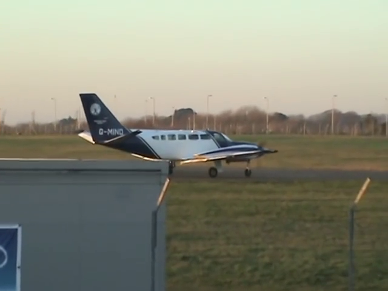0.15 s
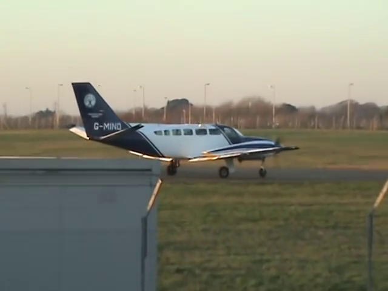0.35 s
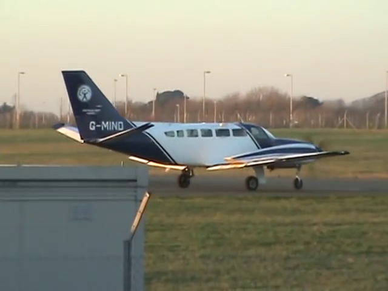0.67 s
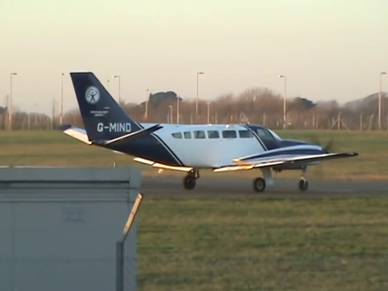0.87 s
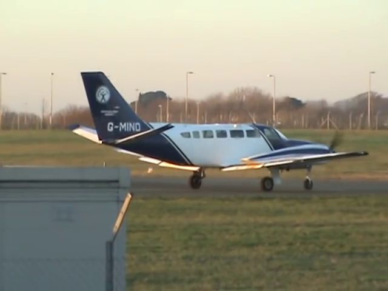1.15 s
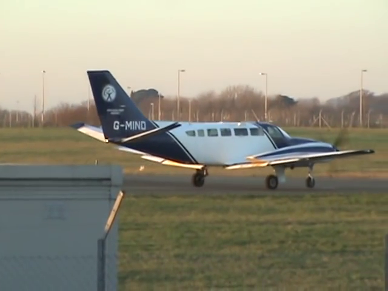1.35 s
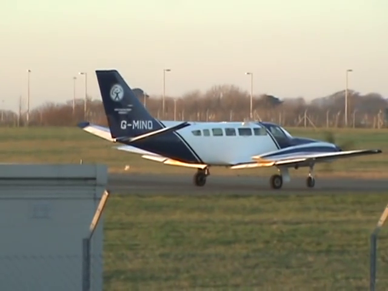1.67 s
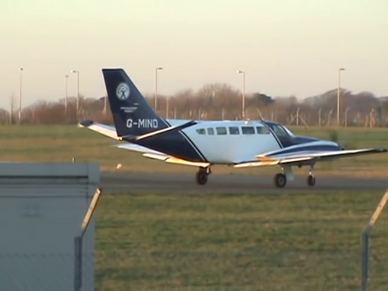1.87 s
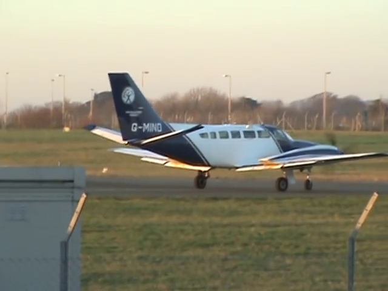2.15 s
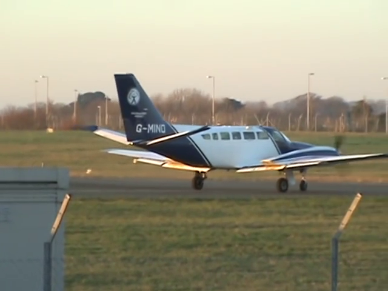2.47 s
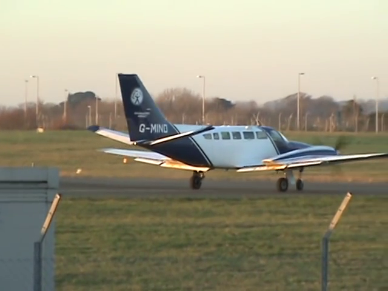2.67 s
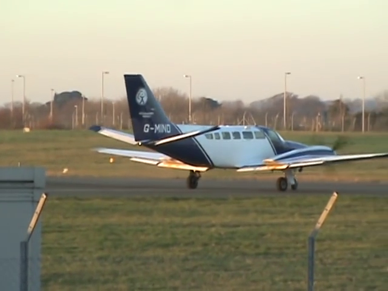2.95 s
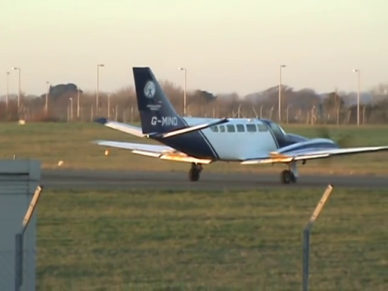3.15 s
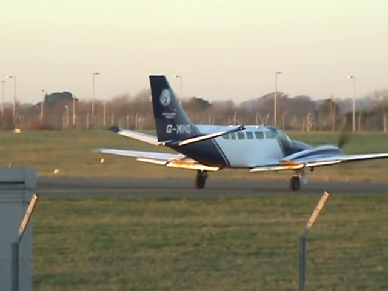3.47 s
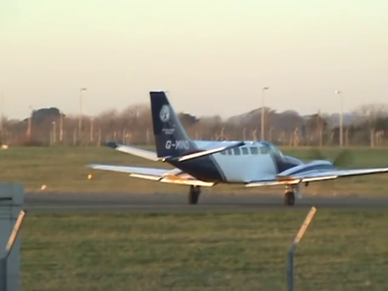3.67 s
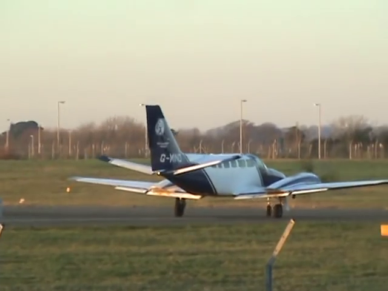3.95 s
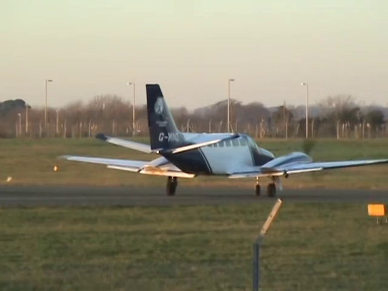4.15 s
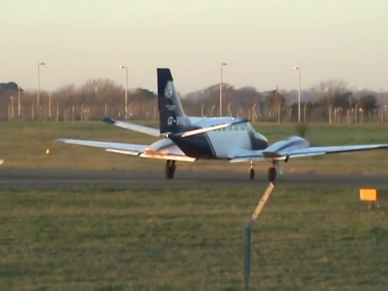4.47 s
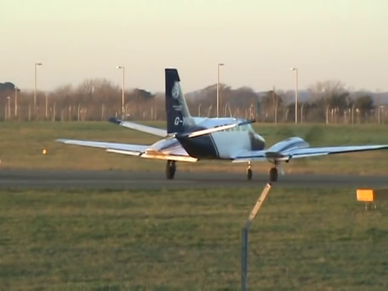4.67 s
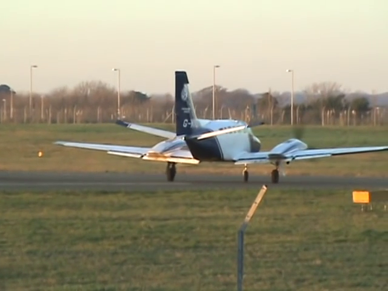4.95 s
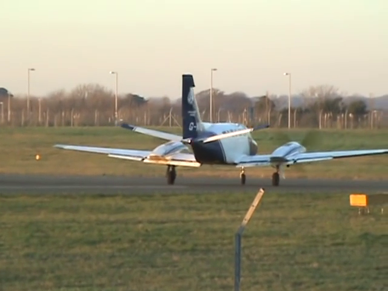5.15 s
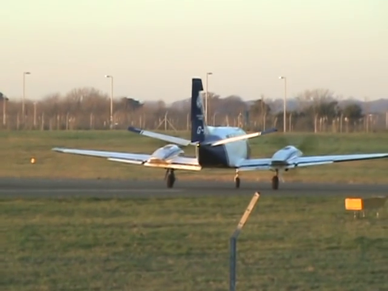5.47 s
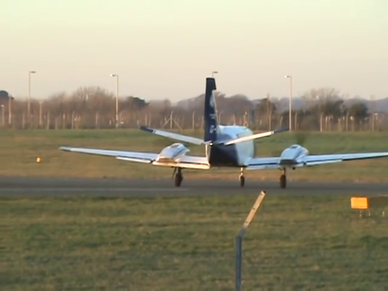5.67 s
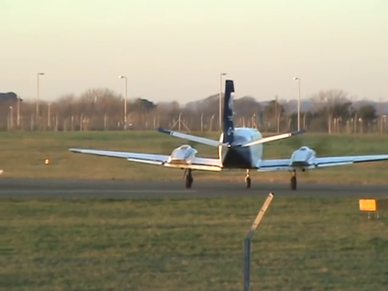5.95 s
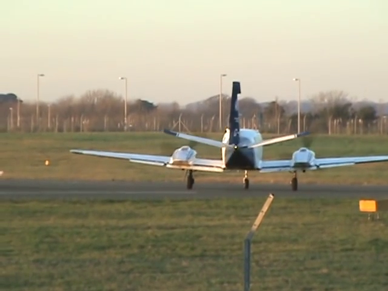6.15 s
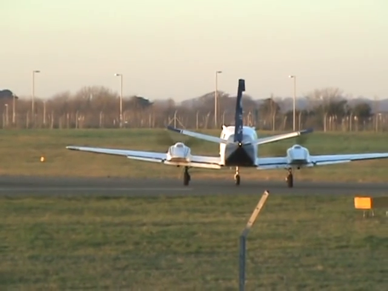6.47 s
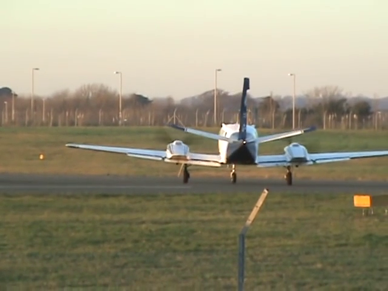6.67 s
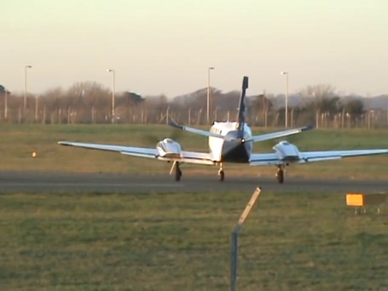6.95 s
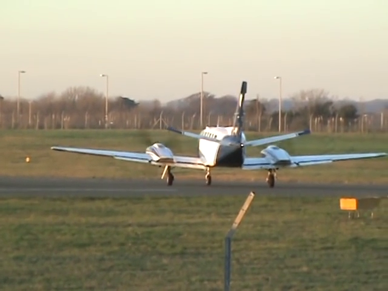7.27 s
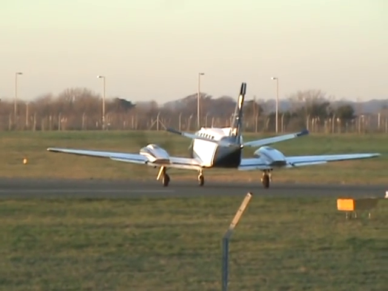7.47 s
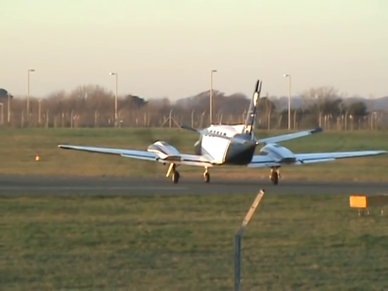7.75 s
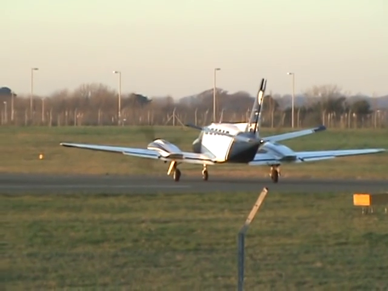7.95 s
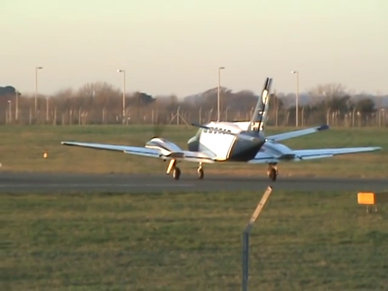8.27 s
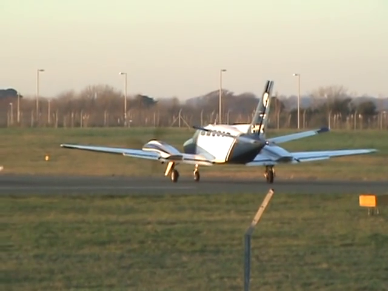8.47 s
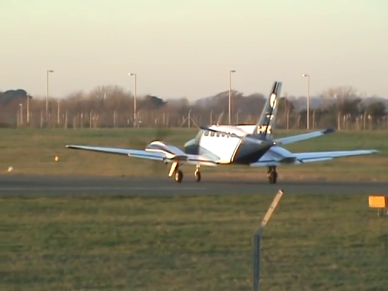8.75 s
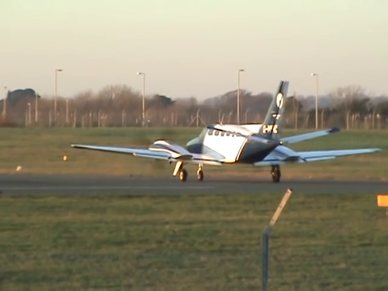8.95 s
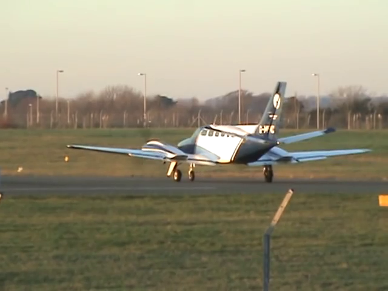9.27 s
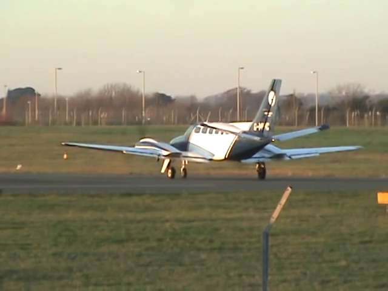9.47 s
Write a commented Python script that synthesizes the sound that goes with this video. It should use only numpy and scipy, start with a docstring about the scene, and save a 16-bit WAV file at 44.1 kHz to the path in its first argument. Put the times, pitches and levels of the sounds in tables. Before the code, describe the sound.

Two piston aircraft engines run at taxi power in the middle distance, a steady, throbbing low drone with propeller rasp and hiss. The nearer engine ticks quickly and crackles once early on. Around halfway the ticking drops out and the propellers swell with a few dry cracks, then soften as the plane swings away. Brief low wind buffets reach the microphone, over a dull outdoor airfield roar.

```python
"""A twin piston aircraft taxis past some way off and turns its tail to the listener.
Its two six-cylinder engines drift apart in speed, so their exhaust drones beat over a low rumble.
Geared three-blade propellers chop the air into wash, rasp and hiss; the near engine ticks while it is
side-on. Thumps, slaps, a crackle and faint whistles dot the pass. Sheds and fences add a short tail,
a little wind touches the microphone, and the airfield roars dully behind it all."""
import sys
import numpy as np
from scipy import signal
from scipy.fft import rfft, irfft, next_fast_len
from scipy.io import wavfile
from scipy.ndimage import uniform_filter1d, map_coordinates

SR = 44100
rng = np.random.default_rng(int(sys.argv[2]) if len(sys.argv) > 2 else 0)


def dump_mix(stems):
    """Bounce the given channels to the path in sys.argv[1] as a 16-bit WAV at rate SR."""
    frames = np.atleast_2d(stems).T  # one column per channel
    limited = np.clip(frames, -1, 1)  # hard clip at full scale
    pcm = np.round(limited * 32767).astype(np.int16)
    wavfile.write(sys.argv[1], SR, pcm)


N = 423801

# share of the noise that comes from the near engine's open flank: t/s, share/0-1
FLANK_SHARE = [(0, 0.9), (.8, 0.86), (1.4, 0.96), (2.2, 0.24), (3.6, 0.21), (4.6, 0), (9.6, 0)]
# spectrum of the tip hiss and the hiss under the ticks: f/Hz, relative level/dB
HISS_COLOUR = [(2500, -25), (3600, -2.5), (4100, 1.5), (4550, -5), (5100, 1), (5450, -7.5), (5800, -2),
               (6250, -6.5), (6800, -2.5), (8400, -10.5), (9500, -15.5), (11000, -29), (15000, -51)]


def exhaust(turns, firing, uneven, firing_db, uneven_db, hard_turn, spread, shake, waver_db):
    """Three firings a turn make the drone; one harder cylinder adds a chug every second turn."""
    angle = 2 * np.pi * turns + shake * wobble(22)
    drone = np.zeros(N)
    for k, level in enumerate(curves(firing), 1):
        stretch = -1.7 * (k - 1) * (k - 2.8)  # the pipe spreads each pulse into a short ring
        drone += amp(level + firing_db + waver_db * wobble(14)) * np.cos(3 * k * angle + stretch)
    behind = np.clip((clock() - 4.2) / 1.25, 0, 1)  # the tail swings round
    receding_db = -4.5 * np.clip((clock() - 6.6) / 0.9, 0, 1)
    for order, side_db, rear_db in uneven:
        level = side_db + behind * (rear_db - side_db) + uneven_db + receding_db + 2.25 * wobble(6)
        smear = 0.352 * (order - 8.5) ** 2 + spread * rng.standard_normal()  # the pipe smears the chug
        drone += amp(level) * np.cos(order * (angle - 2 * np.pi * hard_turn) + smear)
    return np.sqrt(2) * drone


def engines(right_turns, left_turns):
    """Two exhausts at slightly different speeds beat against each other."""
    # exhaust tones as the pipes turn: t/s, relative level/dB at 1, 2 and 3 times the firing rate
    right_firing = [(0.0, -41, -31.5, -30.5), (1.2, -38.5, -28, -23), (2.4, -33, -27, -28.5),
                    (3.6, -30, -31, -25.5), (4.8, -29.5, -26, -30.5), (6.0, -31, -26, -41),
                    (7.2, -32.5, -27, -44.5), (8.4, -33.5, -28.5, -48), (9.6, -35.5, -32, -34.5)]
    left_firing = [(0.0, -37, -35.5, -20), (1.2, -40.5, -44, -30.5), (2.4, -39, -34.5, -26),
                   (3.6, -39.7, -43, -26.5), (4.8, -38, -30, -28), (6.0, -39, -38, -29),
                   (7.2, -36.5, -32, -36), (8.4, -37, -40.5, -40), (9.6, -35, -38.8, -35.5)]
    # tones of unequal cylinders: multiple of crank speed, relative level/dB side-on and from behind
    right_uneven = [(4, -49, -43.5), (4.5, -51, -39.5), (6.5, -69, -41), (7, -37.5, -42.5),
                    (7.5, -33.5, -33.5), (8, -45, -47.5), (8.5, -53, -46.5), (10, -40, -46),
                    (10.5, -40, -48.5), (11, -39.5, -54.5), (11.5, -49, -53.5), (12, -41, -52),
                    (12.5, -42, -50), (14, -47.5, -64.5)]
    left_uneven = [(4, -42, -40), (4.5, -42.5, -55), (6.5, -67, -49), (8, -42, -42), (8.5, -42.5, -50),
                   (9.5, -45, -31.5), (10.5, -38, -44.5), (11, -42, -49.5), (12, -46, -44),
                   (12.5, -45.5, -45.5)]
    right = exhaust(right_turns, right_firing, right_uneven, firing_db=0.2, uneven_db=-1.54,
                    hard_turn=0.96, spread=0.79, shake=0.01, waver_db=1.08)
    left = exhaust(left_turns, left_firing, left_uneven, firing_db=0.44, uneven_db=-1.0,
                   hard_turn=0.6, spread=1.64, shake=0.015, waver_db=1.24)
    return right + left


def rumble():
    """No two firings are alike: a low flutter fills the gaps between the tones."""
    # irregular part of the combustion: t/s, level/dB
    loudness = [(0, -36.3), (3, -33.5), (6.2, -32.5), (8.3, -36.5), (9.6, -36)]
    # its spectrum: f/Hz, relative level/dB
    colour = [(12, -24), (30, -11), (48, -7), (72, -4), (90, -5), (105, -9.5), (150, 2.5), (170, -6.5),
              (190, -15), (210, -11.5), (250, -17), (300, -25), (400, -30.5), (700, -59.5)]
    return amp(curves(loudness)[0]) * noise(colour)


def propellers(right_turns, left_turns):
    """Slipstream, blade rasp and tip hiss follow one loudness and are chopped by the passing blades."""
    # propeller loudness as the aircraft turns: t/s, relative level/dB
    loudness = [(0.05, -38), (0.87, -36), (1.16, -35), (1.95, -39), (4.15, -40), (5.26, -35), (6.0, -36.5),
                (7.01, -44.5), (7.96, -44), (8.14, -42.5), (9.55, -42)]
    level_db, = curves(loudness)
    lift_db = level_db - level_db.mean()
    # each chops hardest as its disc swings past; the right one then slips behind the fuselage
    right_depth = 0.29 * np.minimum(until(7.9), 1) + swell(5.32, 0.6, 0.51)
    left_depth = 0.089 + swell(8.38, 0.36, 0.63)
    chop = right_depth * blade_beat(right_turns) + left_depth * blade_beat(left_turns)
    flutter = wobble(30)
    wash = slipstream(lift_db) * amp(0.8 * flutter) * (1 + 0.27 * chop)
    rasp = blade_rasp(level_db) * amp(0.64 * flutter) * (1 + 0.38 * chop)
    hiss = tip_hiss(lift_db) * amp(0.6 * flutter) * (1 + 0.32 * chop)
    return wash + rasp + hiss


def blade_beat(turns, scatter_db=1.5):
    """Three blades geared two to three pass twice a crank turn; the pulsing has mean 0."""
    times = passes(2 * turns - 0.27)
    pulses = bursts(times, amp(scatter_db * rng.standard_normal(len(times))), rise=0.003, decay=0.004)
    return pulses / pulses.mean() - 1


def slipstream(lift_db, lag_s=0.2):
    """A midrange wash of air sweeps past a little after the blade rasp."""
    # wash side-on and from behind: f/Hz, relative level/dB
    side_colour = [(200, -20), (300, -1.5), (400, -8), (500, -1.5), (640, -5), (760, -1.5), (835, 3.5),
                   (900, -4.5), (1020, -3.5), (1200, -7), (1800, -36)]
    rear_colour = [(200, -27), (300, -14), (380, -10.5), (480, -1.5), (600, -3), (710, 1.5), (830, -2.5),
                   (950, -4.5), (1150, -9.5), (1800, -39)]
    late_lift_db = np.interp(clock() - lag_s, clock(), lift_db)
    level_db = -42.5 + 0.5 * late_lift_db - 1.5 * curves(FLANK_SHARE)[0]
    return amp(level_db) * turning(noise(side_colour), noise(rear_colour))


def blade_rasp(level_db):
    """The blades tear the air into a rasp, grainier from the side."""
    # rasp side-on and from behind: f/Hz, relative level/dB
    side_colour = [(600, -35), (1050, -11), (1200, 1.5), (1400, -2), (1620, -3), (1820, 0.5), (1980, -5),
                   (2140, 1), (2420, -8.5), (2850, -2.5), (3300, -7.5), (4200, -23), (7000, -45.5)]
    rear_colour = [(600, -28), (1000, -2), (1220, 3.5), (1380, 2.5), (1480, -5), (1620, 2), (2100, -1.5),
                   (2380, -5), (2650, -4), (3400, -8), (4200, -17), (7000, -51)]
    rasp = turning(eddies(side_colour, patchy_db=3.0), eddies(rear_colour, patchy_db=1.02))
    return amp(level_db - 0.9) * rasp


def tip_hiss(lift_db, astern_s=5.43, turn_s=0.97):
    """The blade tips hiss most when they face the listener and dull as the far side comes round."""
    # flares of hiss: t/s, half length/s, boost/dB
    flares = [(4.7, .1, 4), (8.432, 0.15, 3), (9.352, 0.28, 5)]
    level_db = -51 + 0.88 * lift_db + sum(swell(*flare) for flare in flares)
    abeam_db = -6 * np.minimum(until(astern_s) / turn_s, 1)
    far_side_db = np.maximum(-12 * since(7.77), -3.5)
    return amp(level_db + abeam_db + far_side_db) * eddies(HISS_COLOUR, patchy_db=1.2)


def ticking(turns):
    """A sharp spit at each firing of the near engine over a hiss, hidden as the aircraft turns away."""
    # the sharpest ticks: t/s, relative peak/dB
    accents = [(0.3994, -32.5), (0.5161, -28.5), (0.573, -33), (1.0898, -25), (1.1302, -31),
               (1.1475, -24.5), (1.207, -33), (1.437, -30.5), (1.552, -29), (1.627, -26.5), (1.722, -25.5),
               (2.0456, -28), (2.7442, -29), (2.897, -32), (3.029, -32), (3.103, -29), (3.5455, -33),
               (3.9738, -33.5), (4.0296, -33)]
    # spells of harder ticking: t/s, half length/s, boost/dB
    surges = [(1.142, 0.11, 4), (1.67, 0.081, 4.5), (3.0, .2, 5.5)]
    # tick spectrum: f/Hz, relative level/dB
    colour = [(1500, -24), (3000, 3.5), (4500, 0.5), (6000, -1.5), (7300, 0), (8400, 1), (9300, -6),
              (10200, -18), (11500, -31), (14000, -47)]
    times = passes(3 * turns + 0.17)
    cylinder_db = np.resize([4.5, -3.5, 5.0, 0.5, 1.0, 5.5], len(times))
    sizes = amp(cylinder_db + 2.6 * rng.standard_normal(len(times)))
    spits = unit(bursts(times, sizes, rise=0.0034, decay=0.0034))
    # swells as the engine comes abeam, holds, wanes, then is hidden; slopes in dB/s
    level_db = -47.5 - 15 * until(0.57) - 2.5 * since(1.75) - 22 * since(4.47)
    level_db += sum(swell(*surge) for surge in surges)
    sharp = hits(accents, gain_db=-7, rise=0.0011, decay=0.0054)
    hiss = amp(level_db - 6 - 9 * until(1.5)) * eddies(HISS_COLOUR, patchy_db=3.0)
    return np.maximum(amp(level_db) * spits, sharp) * eddies(colour, patchy_db=4.5) + hiss


def blade_slaps():
    """Now and then a blade slaps the air with a dry crack."""
    # the hardest slaps: t/s, relative peak/dB
    slaps = [(4.779, -30), (5.432, -19), (5.4878, -18.5), (5.911, -23), (8.163, -33), (8.33, -26.5),
             (8.3883, -26), (8.444, -22.5)]
    colour = [(400, -26), (800, -3), (1300, 2), (2400, 1), (3500, -5.5), (5000, -22), (9000, -36)]
    return hits(slaps, gain_db=-8.5, rise=0.00031, decay=0.0027) * noise(colour)


def crackle():
    """The near engine gives one brief, bright crackle."""
    # its pops: t/s, relative peak/dB
    pops = [(1.1314, -32), (1.17, -18.5), (1.2052, -24), (1.2625, -20.5)]
    colour = [(1200, -21.5), (2300, -5.5), (3100, 0), (4200, -10), (6000, -16), (9000, -30)]
    return hits(pops, gain_db=-10, rise=0.001, decay=0.0072) * noise(colour)


def thumps():
    """Now and then a cylinder fires hard: one low push of gas."""
    # hard firings: t/s, relative peak/dB
    firings = [(1.094, -36.5), (1.781, -38), (2.353, -30.5), (3.122, -38.5), (3.142, -41), (3.365, -36.5),
               (3.811, -35), (4.084, -36), (5.834, -38), (6.465, -33)]
    colour = [(60, -19), (130, -3), (220, 0), (300, -4), (400, -13.5), (600, -40)]
    return hits(firings, gain_db=2.5, rise=0.0034, decay=0.0068) * noise(colour)


def whistles():
    """Thin, slightly rough whistles slide down in pitch."""
    # falling whistles: t/s, length/s, start f/Hz, end f/Hz, level/dB
    glides = [(8.63, 0.13, 3300, 2650, -53), (9.09, 0.067, 3500, 2900, -48), (9.17, .08, 3250, 2600, -55)]
    out = np.zeros(N)
    for start, length, start_hz, end_hz, level_db in glides:
        progress = np.clip((clock() - start) / length, 0, 1)
        pitch_hz = start_hz + (end_hz - start_hz) * progress + 45 * wobble(200)
        tone = np.sqrt(2) * np.sin(2 * np.pi * np.cumsum(pitch_hz) / SR)
        out += amp(level_db) * np.sin(np.pi * progress) * tone
    return out


def reflected(x):
    """A close reflection combs the noise; the comb slides as the aircraft moves."""
    # reflection just behind the direct sound: t/s, delay/ms, strength/0-1
    echo = [(0, 1.385, 0.33), (1.2, 1.427, 0.3), (1.7, 1.48, 0.33), (3, 1.48, 0.23), (4.2, 1.45, 0.18),
            (5.2, 1.536, 0.15), (8.3, 1.455, 0.01)]
    delay_ms, strength = curves(echo)
    delayed = map_coordinates(x, [np.arange(N) - delay_ms * SR / 1000], order=3)
    return (x + strength * delayed) / np.sqrt(1 + strength ** 2)


def apron(x, t60):
    """Sheds and fences scatter a faint, ever-changing tail that differs at each ear."""
    size = 512
    power = abs(signal.stft(x, nperseg=size)[2]) ** 2
    keep = amp(-60 * size / SR / t60)  # power left after each half-frame step
    tail = np.sqrt(signal.lfilter([1 - keep], [1, -keep], power))
    phases = np.exp(2j * np.pi * rng.random((2, *tail.shape)))
    return signal.istft(tail * phases, nperseg=size)[1][:, :N]


def microphones(x):
    """The stereo image: two capsules differ in level and phase from band to band."""
    # balance: f/Hz, left minus right/dB
    tilt = [(60, -6), (99, -8), (160, -10), (270, -6.5), (450, -5.5), (740, -5), (1220, -2), (2010, 0.5),
            (3330, 1.0), (5500, 2.5), (9080, -1.5), (15000, 3)]
    # phase between the capsules: f/Hz, left lead/rad
    lead = [(50, -1.1), (110, -0.4), (170, -0.31), (270, -1.8), (380, -1.5), (600, 0.035), (1030, 0.67),
            (2240, 0.35), (3270, 0.39), (5340, 0.94), (9000, 0), (15000, 0)]

    def response(hz):
        half = amp(along(tilt, hz) / 2) * np.exp(0.5j * along(lead, hz))
        pair = np.array([half, 1 / half])
        return pair / np.maximum(abs(pair.mean(axis=0)), 0.5)
    return filtered(x, response)


def wind():
    """Short low puffs buffet the microphone, mostly on the left."""
    # puffs: t/s, half length/s, level/dB
    puffs = [(5.598, 0.13, -26), (6.065, 0.12, -27.5), (7.598, .12, -37)]
    push = sum(swell(s, half_length, amp(db)) for s, half_length, db in puffs)
    colour = [(12, -5), (35, 1), (95, 0), (160, -18), (400, -30.5), (1500, -78)]
    return push * np.array([noise(colour), amp(-17) * noise(colour)])


def background():
    """The dull, diffuse roar of the airfield and a faint even hiss."""
    # spectra of roar and hiss: f/Hz, relative level/dB
    roar_colour = [(30, -6), (120, 1), (260, 0), (380, -5), (700, -12.5), (2000, -30.5)]
    floor_colour = [(100, 1), (4000, 0), (10000, -1.5), (16000, -1.5)]
    roar = amp(-51.5) * np.array([noise(roar_colour), noise(roar_colour)])
    mid = noise(floor_colour)
    side = 0.37 * np.array([[1], [-1]]) * noise(floor_colour)
    return roar + amp(-64.5) * (mid + side)


def turning(side_on, rear):
    """Cross-fade two noises at equal power as the aircraft turns away."""
    share, = curves(FLANK_SHARE)
    return np.sqrt(share) * side_on + np.sqrt(1 - share) * rear


def noise(colour):
    """Noise of rms 1, coloured by rows of f/Hz, relative level/dB."""
    return unit(filtered(rng.standard_normal(N), lambda hz: shade(colour, hz)))


def eddies(colour, patchy_db):
    """Coloured noise of rms 1 whose spectrum changes from moment to moment."""
    spectrum = signal.stft(rng.standard_normal(N), nperseg=256)[2]
    patches = uniform_filter1d(rng.standard_normal(spectrum.shape), size=5, axis=0)
    patches = uniform_filter1d(patches, size=5, axis=1)
    patchy = signal.istft(spectrum * amp(patchy_db * unit(patches)), nperseg=256)[1][:N]
    return unit(filtered(patchy, lambda hz: shade(colour, hz)))


def shade(colour, hz):
    """The gain of a spectrum, falling 20 dB an octave above its last point."""
    octaves_above = np.log2(np.maximum(hz / colour[-1][0], 1))
    return amp(along(colour, hz) - 20 * octaves_above)


def along(points, hz):
    """Rows of f/Hz, value read on a log frequency axis."""
    freqs, values = np.transpose(points)
    return np.interp(np.log(hz + 1), np.log(freqs + 1), values)


def filtered(x, response):
    """Filter x by a complex response of frequency."""
    size = next_fast_len(N + 8192)
    return irfft(rfft(x, size) * response(np.fft.rfftfreq(size, 1 / SR)), size)[..., :N]


def passes(cycles):
    """The times at which a count of cycles passes whole numbers."""
    return np.interp(np.arange(np.ceil(cycles[0]), cycles[-1]), cycles, clock())


def bursts(times, sizes, rise, decay):
    """An envelope with one quick attack and decay at each time, all in seconds."""
    t = np.arange(SR // 16) / SR
    shape = (1 - np.exp(-t / rise)) * np.exp(-t / decay)
    onsets = np.clip(np.round(times * SR), 0, N).astype(int)
    return signal.fftconvolve(np.bincount(onsets, sizes, N + 1), shape / shape.max())[:N]


def hits(table, gain_db, rise, decay):
    """A burst envelope from rows of t/s, relative peak/dB."""
    times, peak_db = np.transpose(table)
    return bursts(times - rise, amp(peak_db + gain_db), rise, decay)


def wobble(rate):
    """A smooth random curve, rate knots a second."""
    knots = rng.standard_normal(2048)
    coarse = np.arange(0, N + 64, 64)
    return np.interp(np.arange(N), coarse, map_coordinates(knots, [coarse * rate / SR], mode="wrap"))


def curves(rows):
    """One value per sample for each column after the time."""
    times, *columns = np.transpose(rows)
    return [np.interp(clock(), times, column) for column in columns]


def swell(s, half_length, size):
    """A smooth rise and fall around time s."""
    return size * np.exp(-((clock() - s) / half_length) ** 2)


def since(s):
    """Seconds elapsed after time s, 0 before it."""
    return np.maximum(clock() - s, 0)


def until(s):
    """Seconds left before time s, 0 after it."""
    return np.maximum(s - clock(), 0)


def clock():
    """The time of every sample."""
    return np.arange(N) / SR


def amp(db):
    """Decibels to gain."""
    return 10 ** (np.asarray(db) / 20)


def unit(x):
    """Scale to rms 1."""
    return x / np.sqrt(np.mean(x ** 2) + 1e-20)


def scene():
    """Both engines and their propellers, the apron, wind and background."""
    # crankshaft speeds: t/s, right engine/rpm, left engine/rpm
    crank_speeds = [(0.0, 1031.4, 1022.7), (0.7, 1040.1, 1025.0), (1.8, 1049.0, 1015.3),
                    (2.6, 1062.6, 1016.1), (3.2, 1072.9, 1010.7), (4.0, 1080.5, 1019.1),
                    (4.9, 1108.7, 1015.9), (5.6, 1120.9, 1026.9), (6.5, 1116.4, 1046.2),
                    (7.3, 1131.3, 1045.4), (8.2, 1127.5, 1058.3), (8.8, 1135.2, 1062.4),
                    (9.6, 1140.9, 1064.2)]
    right_rpm, left_rpm = curves(crank_speeds)
    right_turns = np.cumsum(right_rpm) / (60 * SR) + 0.05
    left_turns = np.cumsum(left_rpm) / (60 * SR) - 0.02
    drone = engines(right_turns, left_turns)
    rush = propellers(right_turns, left_turns) + ticking(right_turns) + blade_slaps() + crackle()
    rush = reflected(rush)
    direct = microphones(drone + rumble() + thumps() + rush + whistles())
    low_scatter = amp(-8) * np.array([rumble(), rumble()])
    return direct + low_scatter + amp(-6.5) * apron(rush, t60=0.12) + wind() + background()


def record(dry):
    """A brick-wall low-pass takes off the very top."""
    return filtered(dry, lambda hz: hz < 15700)


dry = scene()
out = record(dry)
dump_mix(out)
```